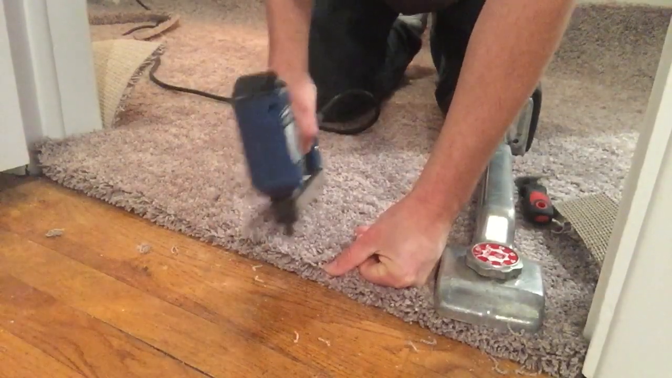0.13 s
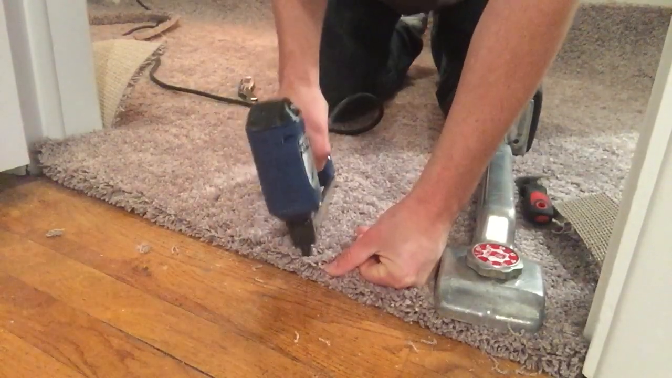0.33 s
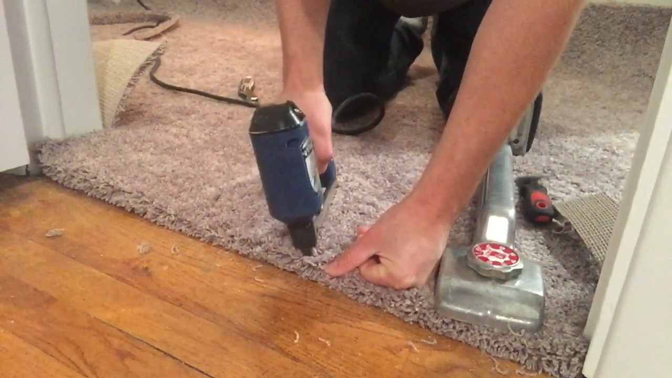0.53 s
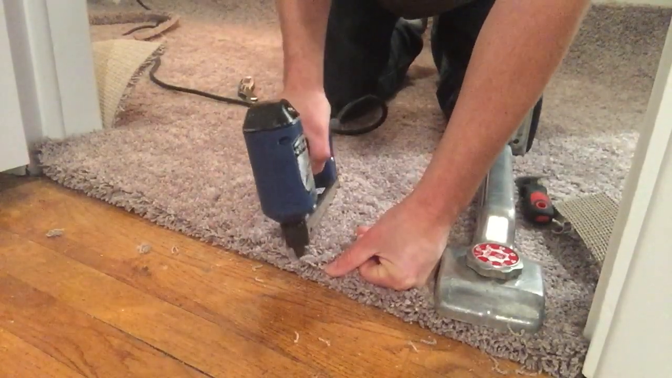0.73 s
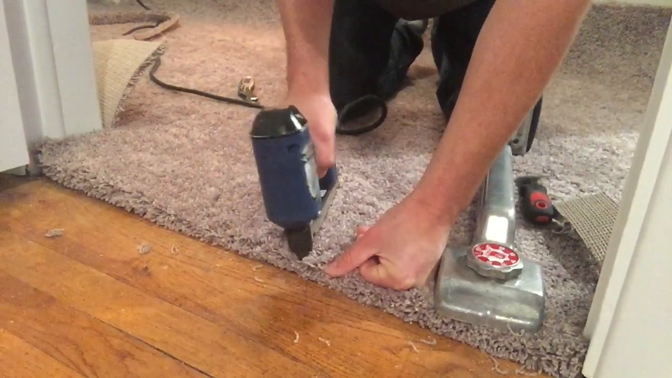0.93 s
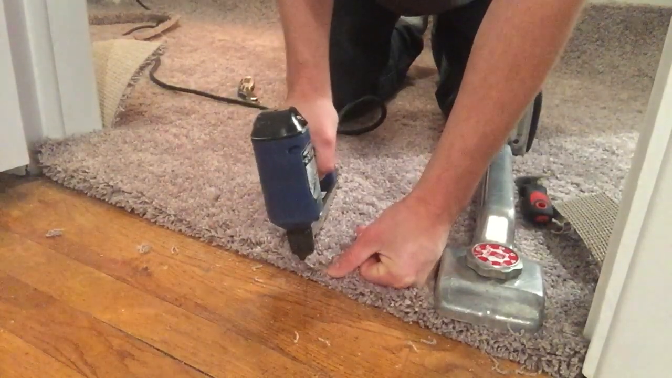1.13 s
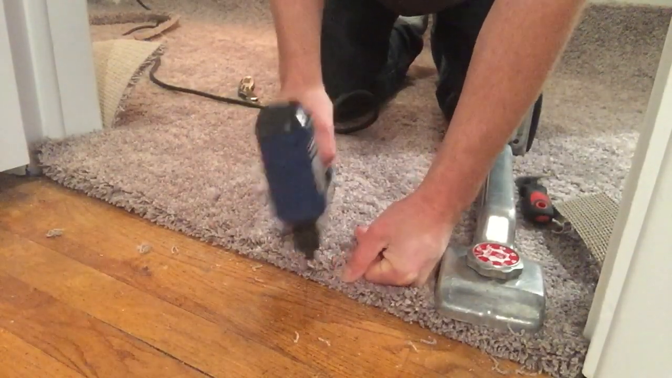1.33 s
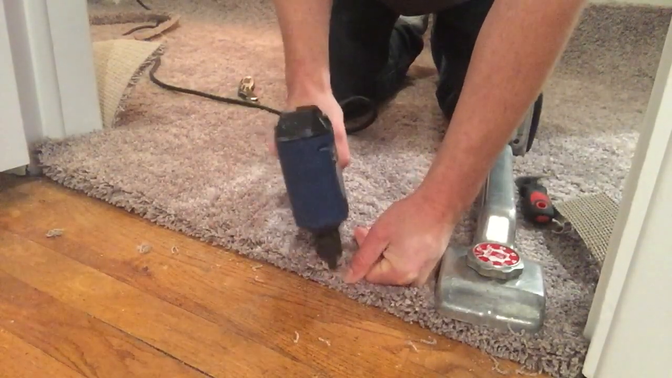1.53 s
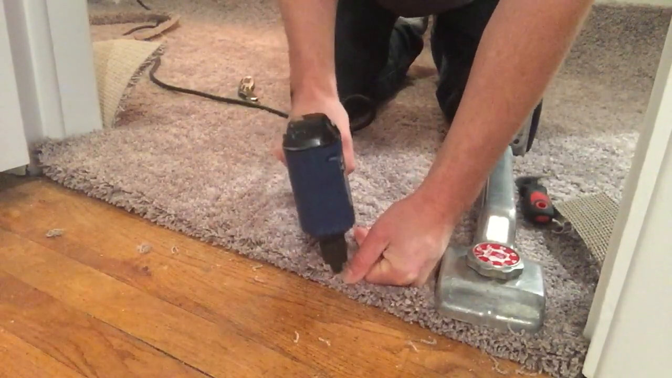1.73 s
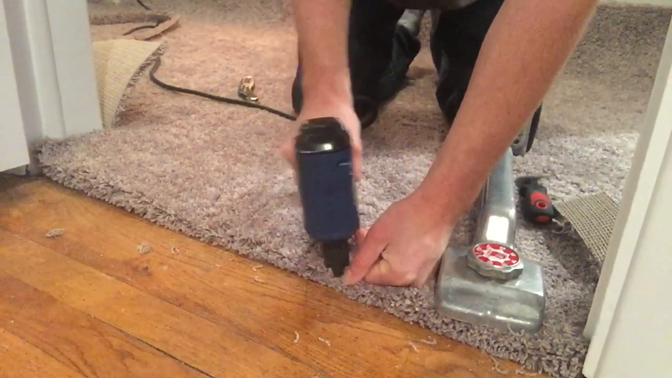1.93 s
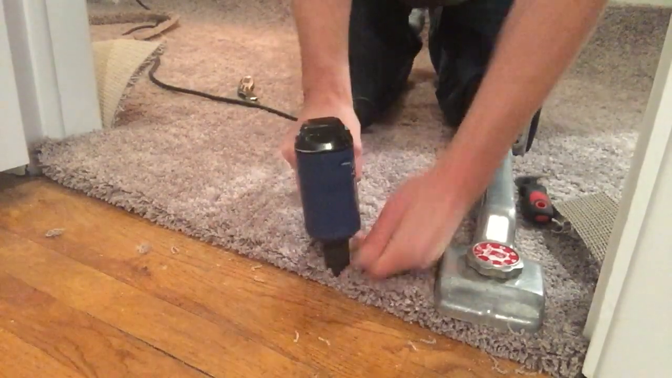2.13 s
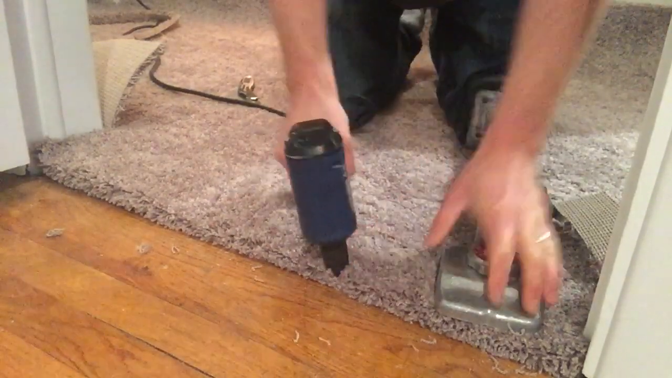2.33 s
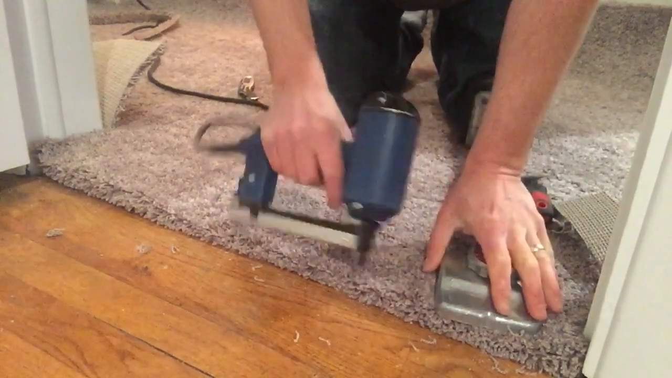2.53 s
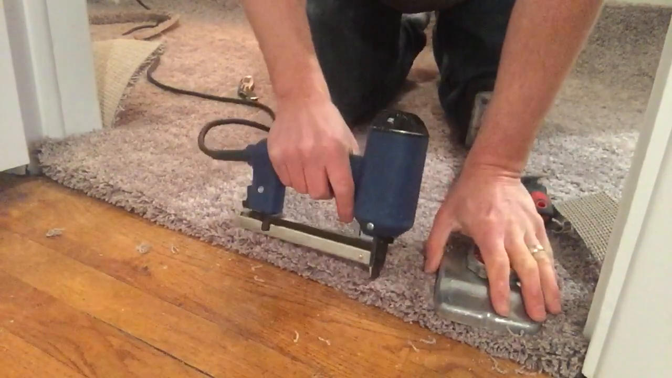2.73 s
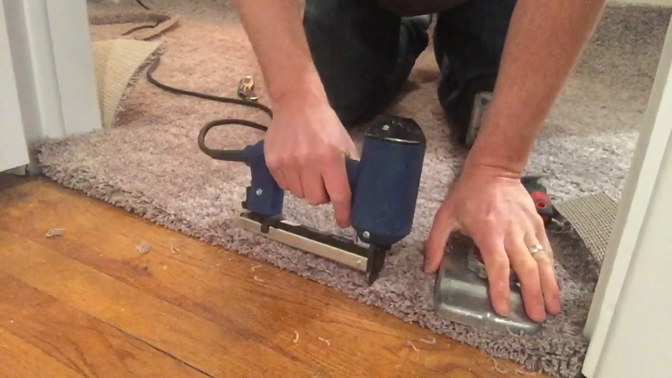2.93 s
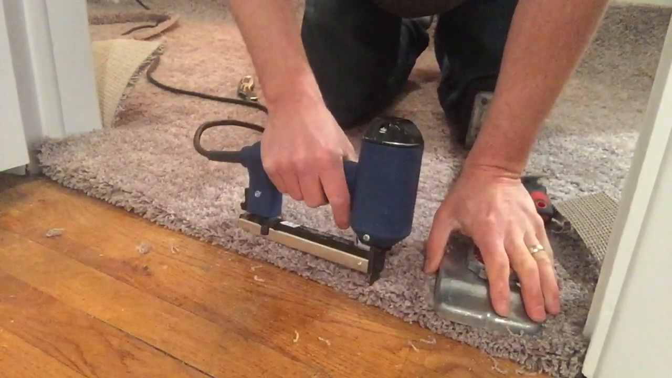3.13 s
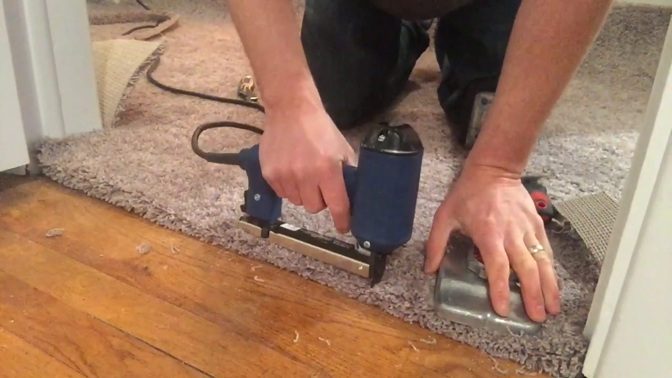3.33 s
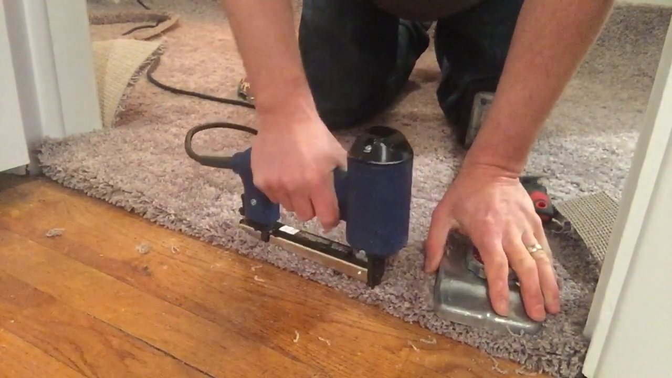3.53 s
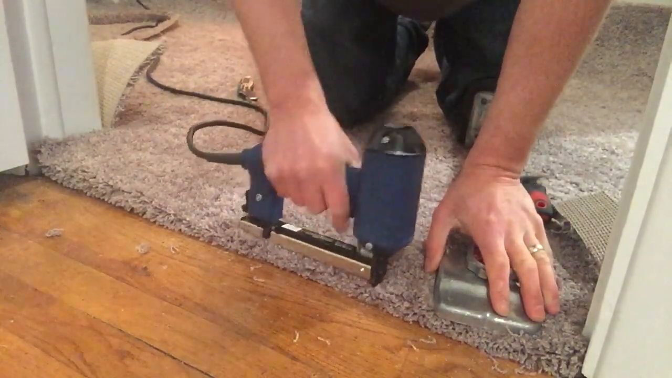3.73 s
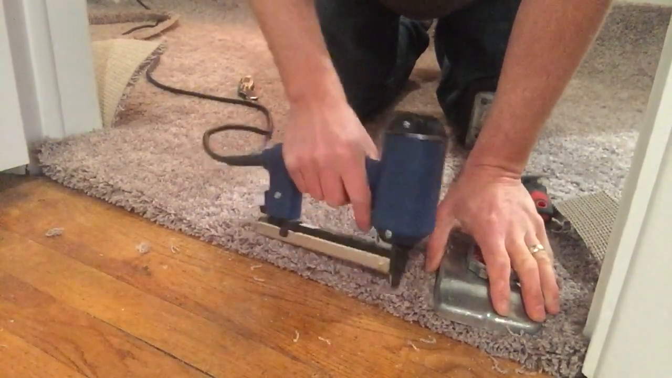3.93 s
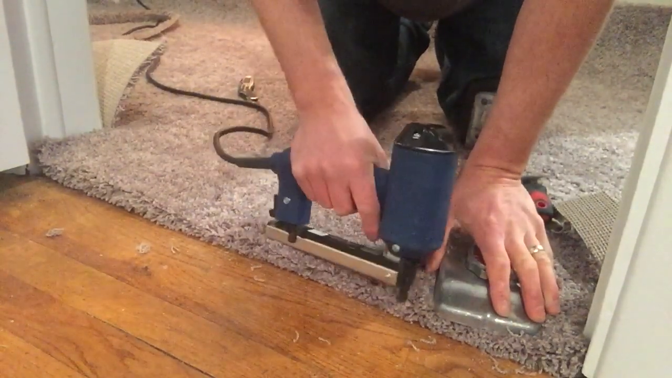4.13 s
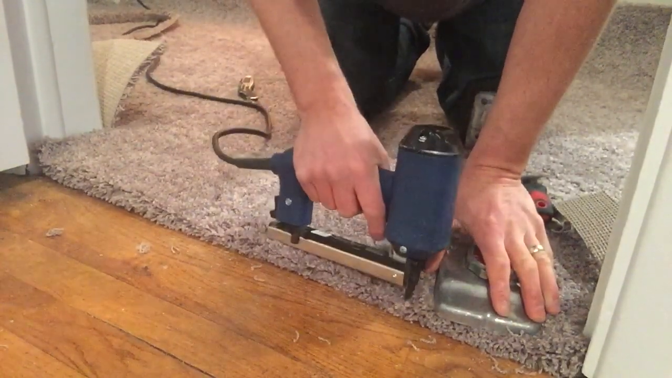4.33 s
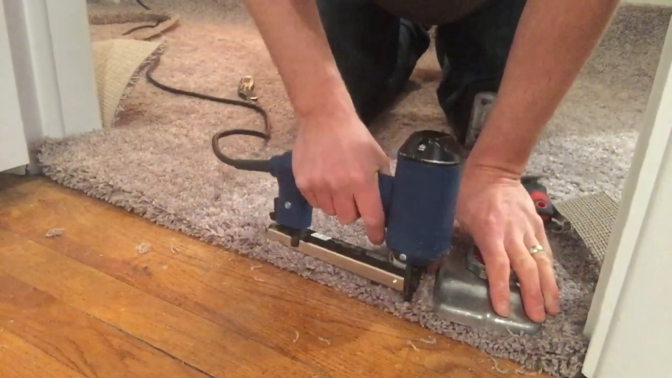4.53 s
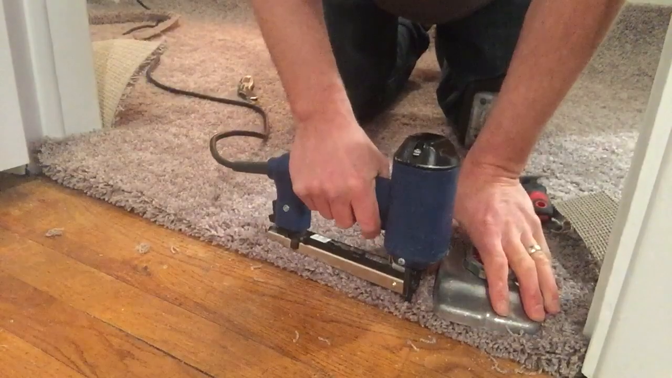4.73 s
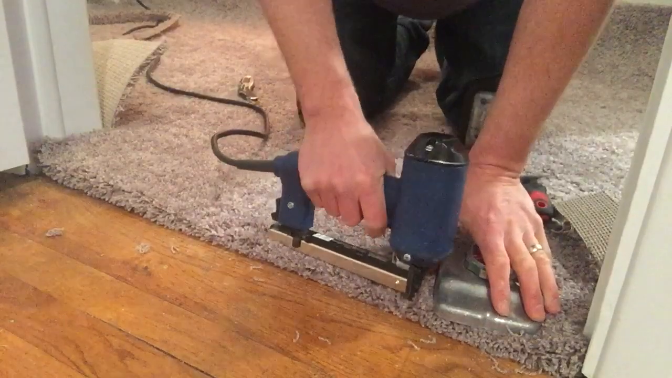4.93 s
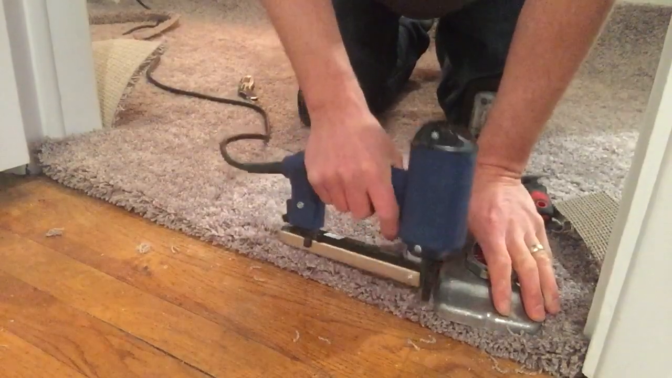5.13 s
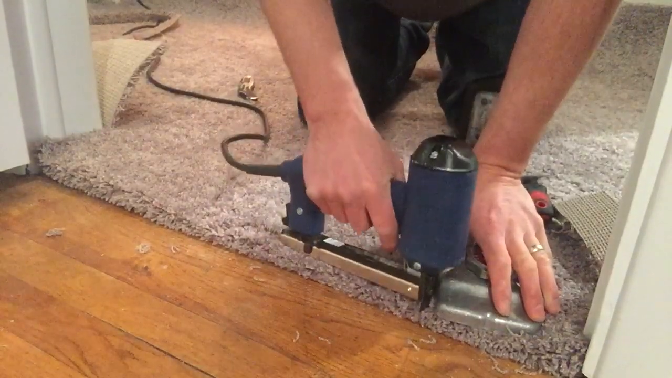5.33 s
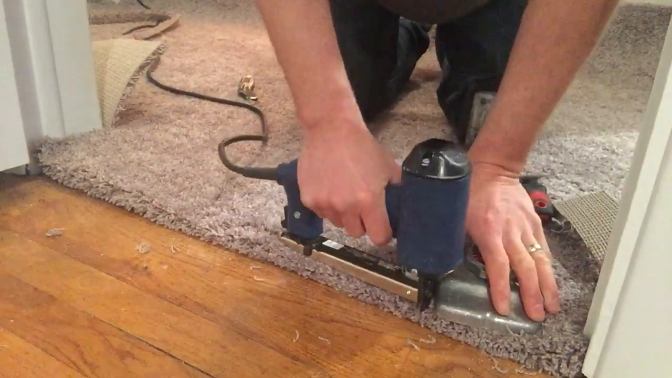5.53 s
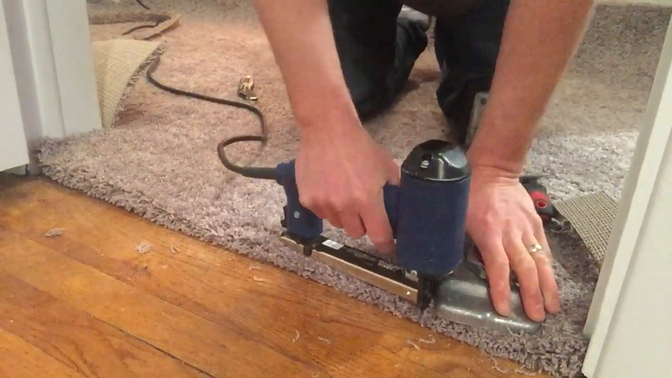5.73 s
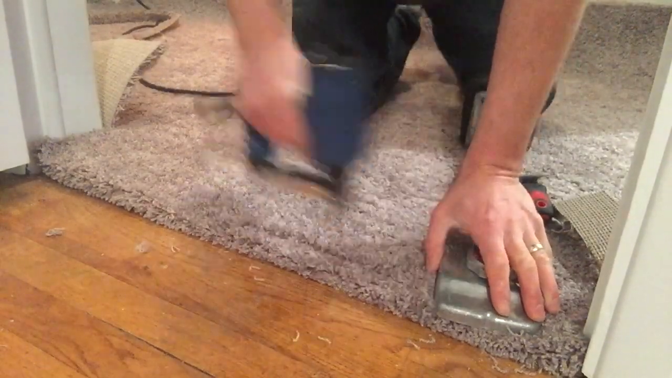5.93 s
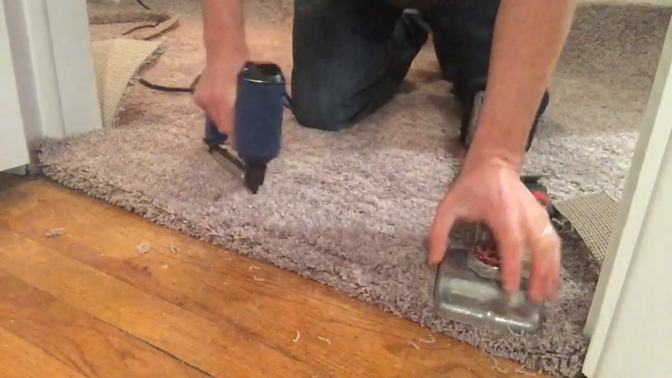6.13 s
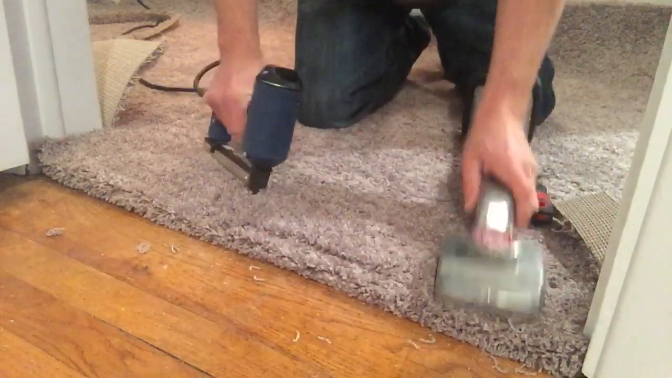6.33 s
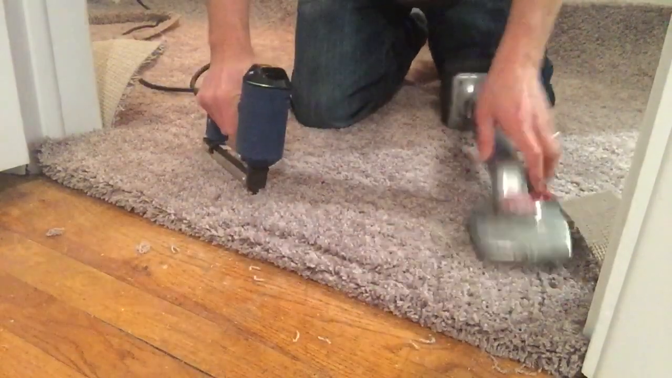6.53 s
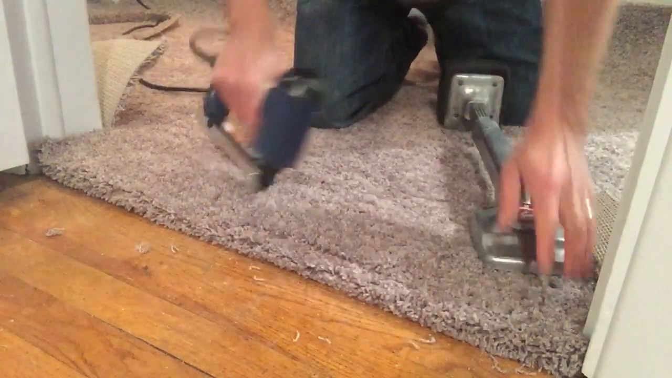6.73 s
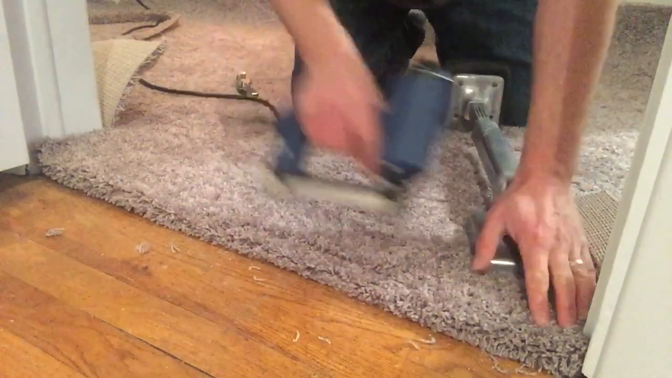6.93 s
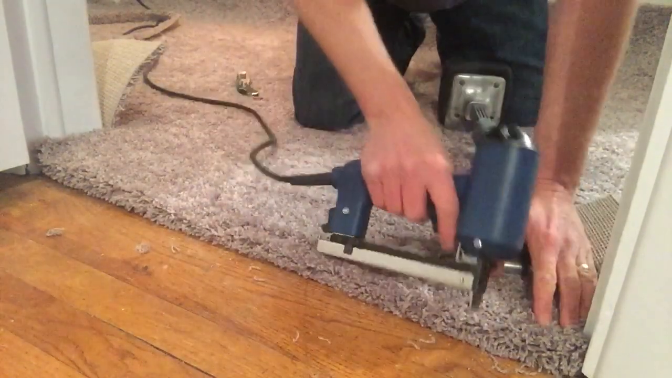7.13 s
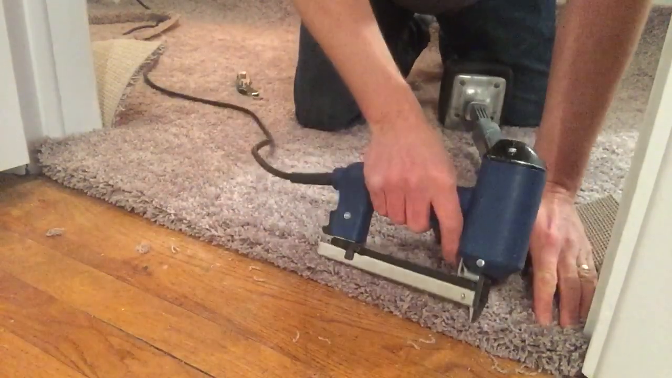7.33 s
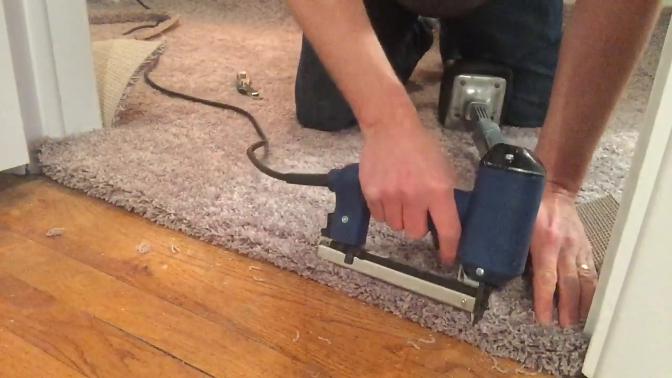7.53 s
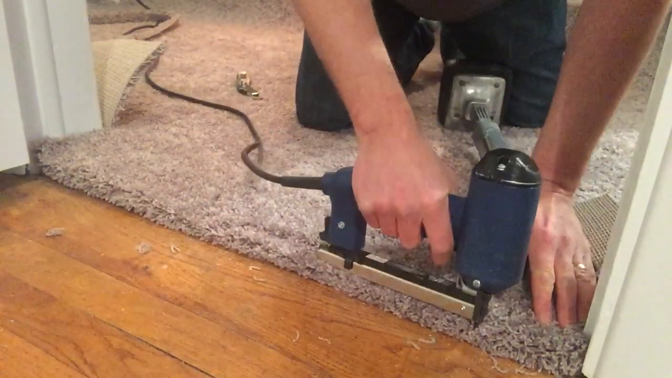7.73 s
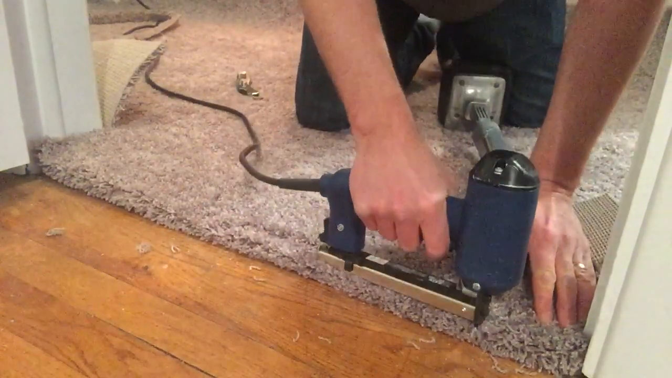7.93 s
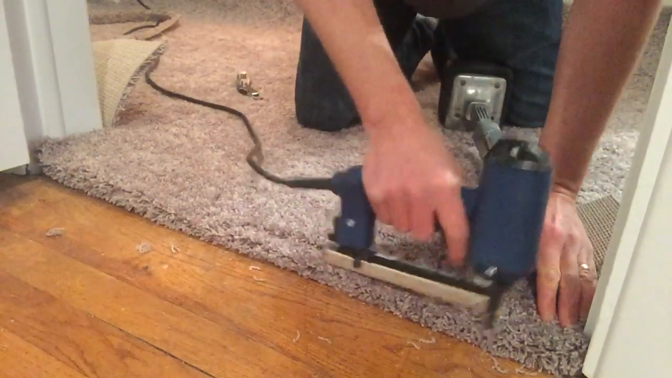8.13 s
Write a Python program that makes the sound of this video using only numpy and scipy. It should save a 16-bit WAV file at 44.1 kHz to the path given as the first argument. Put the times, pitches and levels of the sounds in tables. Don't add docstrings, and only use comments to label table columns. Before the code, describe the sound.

Close up, an electric staple gun fires loud single shots at uneven intervals, the floor thumping, tools knocking, and a metal tool clanking before the last.

```python
import sys
import numpy as np
from scipy import signal
from scipy.fft import rfft, irfft
from scipy.io import wavfile
from scipy.ndimage import uniform_filter1d

SR = 44100
rng = np.random.default_rng(int(sys.argv[2]) if len(sys.argv) > 2 else 0)


def boost(x):
    u = np.asarray(x, float) / 20
    return 10 ** u


def store_pcm(level_fs):
    pcm = np.round(np.clip(level_fs, -1, 1) * 32767).astype(np.int16)
    wavfile.write(sys.argv[1], SR, np.atleast_2d(pcm).T)


N = 361619
LEAD = 4410


def rms_one(x):
    return x / np.sqrt(np.mean(x ** 2) + 1e-20)


def at_hz(points, hz, column=1):
    table = np.array(points)
    return np.interp(np.log(hz), np.log(table[:, 0]), table[:, column])


def colour(x, spectrum):
    hz = np.arange(len(x) // 2 + 1) * SR / len(x) + 1
    return irfft(rfft(x) * boost(at_hz(spectrum, hz)), len(x))


def ring(x, hz, t60):
    r = boost(-60 / (t60 * SR))
    w = 2 * np.pi * hz / SR
    return signal.lfilter([0, np.sin(w)], [1, -2 * r * np.cos(w), r * r], x + 1e-18)


def add(out, s, sound):
    i = LEAD + round(s * SR)
    out[..., i:i + sound.shape[-1]] += sound[..., :out.shape[-1] - i]


def burst(spectrum, rise_s, hold_s, t60, size=6000):
    t = np.arange(size) / SR
    shape = np.clip(t / rise_s, 0, 1) * boost(-60 * np.clip(t - hold_s, 0, None) / t60)
    return shape * rms_one(colour(rng.standard_normal(size), spectrum))


def tick(hz, bright_db, t60, width):
    near, mid, far = 1 + width, 1 + 4 * width, 2 + 8 * width
    lobe = [(hz / far, -65), (hz / mid, -40), (hz / near, -8), (hz, 0),
            (hz * near, -8), (hz * mid, -40), (hz * far, -65)]
    snap = [(hz / 6, -20), (hz / 2, -3), (hz, 0), (hz * 3, -5), (hz * 12, -24)]
    rattle = .5 * burst(lobe, .0008, .0034, t60, size=2048)
    return rattle + boost(bright_db) * burst(snap, .00018, .001, .87 * t60, size=2048)


def pulse(spectrum, turn):
    click = np.zeros(2048)
    click[400] = 1
    return colour(click, spectrum) * [[np.cos(turn)], [np.sin(turn)]]


# fullest lean in seconds, rumble in dB.
SHIFTING = [(.45, -48), (.75, -54), (1.05, -55), (2.55, -50), (3.56, -57), (4.2, -48), (4.4, -52),
            (4.7, -50), (6.7, -44), (6.9, -54), (7.8, -60)]


def shifting():
    lean_s, settle_t60_s = .04, .7
    restless_db, swing_db = -66, 4
    t = np.arange(N) / SR
    leans = np.zeros(N)
    for s, db in SHIFTING:
        settling = boost(db - 60 * np.clip(t - s, 0, None) / settle_t60_s)
        leans += settling * np.clip(1 + (t - s) / lean_s, 0, 1)
    slow = uniform_filter1d(rng.standard_normal(N), size=2000)
    slow = rms_one(uniform_filter1d(slow, size=2000))
    return leans + boost(restless_db + swing_db * slow)


# frequency in Hz, level in dB per Hz.
QUIET = [(15, -62), (25, -42), (92, -5), (171, -9.5), (271, -17.5), (319, -9), (440, -24), (891, -26.5),
         (966, -31), (1080, -26), (1170, -31.5), (3540, -34), (6500, -36), (16100, -45)]


def background():
    steady = boost(-61.5) * rms_one(colour(rng.standard_normal(N), QUIET))
    rumble = [(20, -32), (45, -4), (90, 10), (140, -5), (300, -12.5), (450, -46.5), (900, -81.5)]
    low = rms_one(colour(rng.standard_normal(N), rumble))
    return steady + boost(2.8) * shifting() * low


# frequency in Hz, colour in dB, early t60 in seconds,
# late t60 in seconds, late share in dB.
ROOM = [(100, -0.5, .3, 2.4, -16), (300, -0.5, .25, 0.4, 1.5), (500, 2.5, .25, 1.3, -5.5),
        (800, 2, 0.46, 1.2, -3.5), (1150, 5, .3, 1.2, -4), (1600, 3, .3, 1.246, 1.5),
        (2250, -2, .3, 1.1, -2.5), (3400, 0.5, .3, 1.024, -1.5), (4550, 3, .3, 0.8, -7),
        (5450, -6, 0.75, .5, -2.5), (7000, -0.5, .2, .4, -4), (10000, -6.5, 0.05, .3, 0),
        (14100, -4, .12, 0.083, -5)]


def room(wet):
    t = np.arange(round(1.4 * SR)) / SR
    white = rng.standard_normal((2, 2, len(t)))
    echo = 0
    edges = 30 * 2 ** np.arange(0, 9.4, 1 / 3)
    for k, (low, high) in enumerate(zip(edges, edges[1:])):
        hz = np.sqrt(low * high)
        level_db, early, late, late_db = [at_hz(ROOM, hz, column=c) for c in range(1, 5)]
        sos = signal.butter(2, [low, high], "band", fs=SR, output="sos")
        band = signal.sosfilt(sos, white[k % 2])
        decay = boost(-60 * t / early) + boost(late_db - 60 * t / late)
        echo = echo + band * boost(level_db) * decay
    echo = echo * np.clip(t / .012, 0, 1) * boost(-19 * t ** 3)
    lumps = rms_one(uniform_filter1d(rng.standard_normal(t.shape), size=400))
    echo = echo * boost(2.2 * lumps * np.exp(-t / .2))
    return boost(-38.5) * signal.fftconvolve(wet, echo, axes=1)[:, :N + LEAD].sum(0)


# start in seconds, end in seconds, level in dB.
JINGLES = [
    (1.601, 1.722, -90.5),
    (3.86, 3.902, -81.5),
    (3.968, 4.04, -82),
    (4.199, 4.288, -85),
    (5.262, 5.337, -85),
    (6.188, 6.25, -84.5),
    (6.97, 7.102, -90),
]
STAPLE_HZ = [6250, 7360, 7880, 11560, 12780]


def jingle():
    t = np.arange(N) / SR
    moving = sum(boost(db) * (t > start) * (t < end) for start, end, db in JINGLES)
    moving = uniform_filter1d(moving, size=900)
    touches = moving * rng.standard_normal(N) * (rng.random(N) < .1)
    rings = sum(ring(touches, hz, .028) for hz in STAPLE_HZ)
    return rings + boost(23) * np.diff(touches, prepend=0)


# start in seconds, peak in dB, pitch in Hz.
SNAPS = [(2.47, -57, 9070), (3.405, -59.5, 7960), (4.688, -48, 5500), (4.813, -53, 2830),
         (5.04, -43.5, 11020), (5.39, -51, 10000), (6.271, -57, 12500), (6.581, -42, 6000),
         (6.99, -58, 5940), (7.05, -59, 6000), (7.585, -62, 8000), (7.775, -59, 5000), (7.89, -58, 3000)]
# start in seconds, peak in dB, pitch in Hz, brightness in dB.
KNOCKS = [(2.287, -31, 1486, -27), (2.515, -35, 1819, -22), (2.712, -31, 1460, -13),
          (4.019, -36, 1733, -30), (4.69, -48, 2457, -15), (4.692, -51, 1200, -20),
          (5.22, -34.5, 1610, -30), (6.225, -40, 1150, -18), (6.44, -34, 1500, -14),
          (6.567, -26, 1320, -30), (6.65, -12, 1770, -26), (6.667, -22, 1940, -10), (6.95, -52, 890, -25),
          (7.02, -53, 1010, -22), (7.075, -52, 2900, -12), (3.587, -58, 2000, -30), (7.217, -38, 1505, -24),
          (7.39, -56, 1410, -30)]


def knocks():
    out = np.zeros(N + LEAD)
    for s, db, hz, bright_db in KNOCKS:
        add(out, s, boost(db) * tick(hz, bright_db, t60=.008 + 24 / hz, width=.15))
    for s, db, hz in SNAPS:
        add(out, s, boost(db) * tick(hz, -6, t60=.01, width=.5))
    return out


# start in seconds, peak in dB, ring in dB, low thud in dB, brightness in dB.
CLANKS = [
    (6.2932, -7.5, -24.5, -52, 4.5),
    (6.601, -19, -46, -42, -5),
    (6.648, -12.5, -66, -37, -7),
]
# frequency in Hz, level in dB per Hz.
CLANK = [(250, -40), (634, -19), (1100, -12.5), (2140, -1), (5500, -6), (9090, -14), (10600, -22),
         (14000, -15), (16000, -20)]
# frequency in Hz, level in dB, t60 in seconds.
STRETCHER = [(655, -3, .25), (661, -16, .6), (671, -17, .6), (1626, -8, .3), (1976, -11, .3),
             (2400, -13, .3), (2885, -11, .35), (3467, -12, .35), (3951, -13, .35), (5146, -13, .25),
             (6406, -16, .15), (6900, -16, .15), (8900, -16, .2)]


def stretcher():
    out, blows, wet = np.zeros(N + LEAD), np.zeros(N + LEAD), np.zeros((2, N + LEAD))
    thud = [(30, 1), (80, 3.5), (250, -9), (500, -18), (2000, -69.5)]
    sizzle = [(2000, -25), (6000, 0), (12000, -3), (16000, -7)]
    for k, (s, db, ring_db, thud_db, bright_db) in enumerate(CLANKS):
        contact_s = .0045 - .0002 * bright_db
        room_db = db - 11.3 - .5 * bright_db
        tilted = [(hz, level_db + bright_db * np.log2(hz / 2000) / 2.1) for hz, level_db in CLANK]
        add(out, s, boost(db - 6.5) * burst(tilted, contact_s / 5, contact_s, .022))
        add(wet, s - .008, boost(room_db + 33.5) * pulse(tilted, k))
        add(out, s, boost(thud_db) * burst(thud, .024, .02, .42, size=16000))
        loose_db = room_db - 19 + 1.6 * bright_db
        add(out, s, boost(loose_db) * burst(sizzle, .004, .02, .27, size=12000))
        add(blows, s + .004, boost([ring_db]))
    for hz, db, t60 in STRETCHER:
        out += boost(db) * ring(blows, hz, t60)
    return out, wet


# frequency in Hz, level in dB, t60 in seconds.
BOARDS = [(60, -7.5, .15), (90.9, -5, 0.35), (133.5, -2, 0.32), (165, -2, 0.16), (212.6, -1, 0.13),
          (235.7, -19, 1.5), (285, -12, 0.45), (396, -4.5, 0.061), (451, 0, 0.063), (545, -7, .07),
          (628, -10, 0.066)]
# deep modes in dB, upper modes in dB.
SPOTS = [
    (-3, -1),
    (2.5, -2.5),
    (-2.5, 1.2),
    (1.5, 0.2),
    (1.2, 2.2),
    (4, 0.6),
    (0.2, 5.5),
]
# frequency in Hz, level in dB per Hz.
JOISTS = [(20, -30), (45, -7), (65, -4), (92, 0.5), (112, -2.5), (135, -2.5), (170, -14), (232, -7.5),
          (270, -14), (300, -15), (420, -34), (900, -77.5)]


def boards():
    out = np.zeros(N + LEAD)
    push = np.hanning(60) / 30
    for k, (hz, db, t60) in enumerate(BOARDS):
        blows = np.zeros(N + LEAD)
        delay_s = .008 if hz < 300 else .014
        for (s, _, _, boom_db, thud_db), (deep_db, upper_db) in zip(SHOTS, SPOTS):
            if hz < 110:
                level_db = boom_db + deep_db
            elif hz <= 190:
                level_db = boom_db
            elif hz < 300:
                level_db = boom_db + upper_db
            else:
                level_db = thud_db
            add(blows, s + delay_s, boost(level_db + db - 2) * push * (-1) ** k)
        out += ring(blows, hz, t60)
    for s, _, _, boom_db, _ in SHOTS:
        rumble_t60 = .85 - .05 * boom_db
        rumble = burst(JOISTS, .04, .089, rumble_t60, size=56000)
        add(out, s + .008, boost(-18 + .7 * boom_db) * rumble)
    return out


# switch click in seconds, finger's first touch in dB, switch in dB, catch in dB.
PULLS = [
    (1.1877, -44, -25, -35),
    (2.0523, -45, -27, -35.5),
    (3.631, -41, -26, -27),
    (4.8463, -60, -23.5, -25.5),
    (5.628, -65, -25, -24.5),
    (7.931, -65, -24.5, -28.5),
]


def trigger():
    out = np.zeros(N + LEAD)
    for (s, touch_db, switch_db, catch_db), shot in zip(PULLS, SHOTS[1:]):
        add(out, s - .0215, boost(touch_db) * tick(3270, -22, t60=.014, width=.2))
        add(out, s, boost(switch_db) * tick(3050, -9, t60=.026, width=.6))
        add(out, s + .012, boost(catch_db) * tick(2050, -4, t60=.022, width=.6))
        add(out, shot[0] - .007, boost(-35) * tick(2050, -1, t60=.014, width=.6))
    return out


# frequency in Hz, level in dB per Hz.
CRACK = [(180, -28.5), (300, 6.5), (917, 0.5), (1370, 0), (3050, 0), (3540, -2), (5110, -20.5),
         (6450, -2.5), (8280, -13), (14400, -11), (16100, -27.5)]
# start in seconds, force in dB, plunger launch in dB, floor boom in dB, dull thud in dB.
SHOTS = [
    (-.016, -3, -11, -5.5, -12),
    (1.2107, 0.2, -11, -16, -6),
    (2.077, 0.2, -9, -3, -5),
    (3.66, -.6, -8, -3.5, -5.5),
    (4.877, 0.2, -3, -6, -2.5),
    (5.66, 0.3, -7, -6, -8),
    (7.961, 0.2, -3, -11.5, -7),
]


def gun():
    out, wet = np.zeros(N + LEAD), np.zeros((2, N + LEAD))
    launch = [(300, -15), (2500, -6.5), (16000, -6)]
    housing = [(300, 2.5), (3000, 3.5), (8000, -15.5), (16000, -11.5)]
    creeping = [(200, -8), (800, 7), (2500, -10), (8000, -19), (9500, -27.5), (16000, -25)]
    t = np.arange(800) / SR
    for k, (s, force_db, launch_db, boom_db, _) in enumerate(SHOTS):
        whine = ring(rng.standard_normal(800), 8100, .06) * np.clip(t / .003, 0, 1)
        creep = burst(creeping, .012, .013, .01, size=800)
        add(out, s - .015, boost(-43) * rms_one(whine) + boost(-29) * creep)
        add(out, s, boost(launch_db) * burst(launch, .0006, .002, .014))
        add(out, s + .0036, boost(force_db + 1.8) * burst(CRACK, .00027, .005, .016))
        add(out, s + .0033, boost(-19.5) * burst(housing, .0037, .02, .24, size=16000))
        room_db = force_db - 1.4
        low = boom_db - room_db
        sent = [(25, low - 12), (60, low + 4), (250, low + 4), (500, 0), (16000, 0)]
        add(wet, s - .005, boost(room_db + 26) * pulse(sent, k))
    return out, wet


def scene():
    shots, shots_wet = gun()
    clanks, clanks_wet = stretcher()
    tools = clanks + knocks()
    near = boost(-23.5) * tools * [[1], [0]]
    mix = shots + trigger() + boards() + tools + room(shots_wet + clanks_wet + near)
    return (mix[LEAD:] + jingle() + background())[None]


def roll_off(x):
    return signal.sosfilt(signal.butter(12, 16290, fs=SR, output="sos"), x)


def record(dry):
    top = .98
    dry = signal.sosfilt(signal.cheby2(16, 60, 16350, fs=SR, output="sos"), dry)
    mix = dry / (1 + np.abs(dry / top) ** 8) ** (1 / 8)
    return roll_off(mix)


dry = scene()
out = record(dry)
store_pcm(out)
```